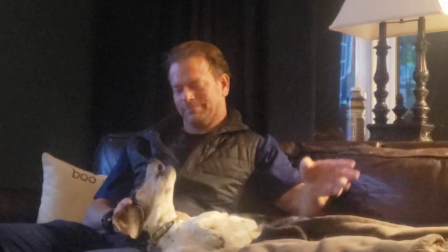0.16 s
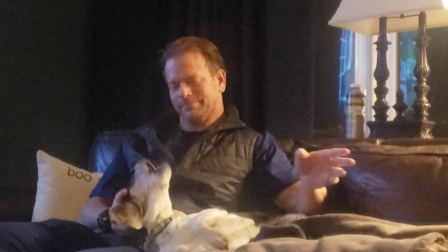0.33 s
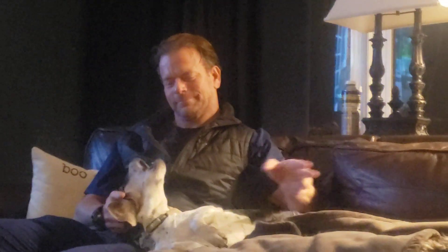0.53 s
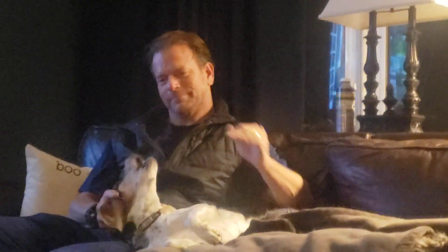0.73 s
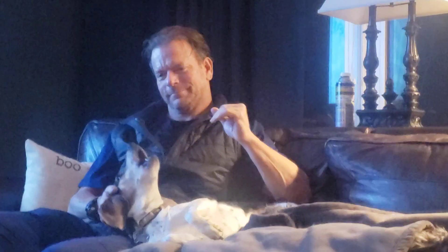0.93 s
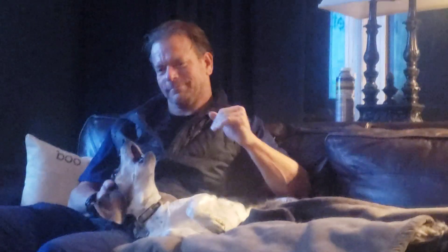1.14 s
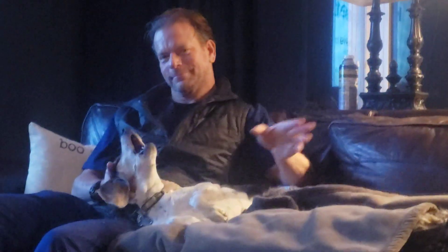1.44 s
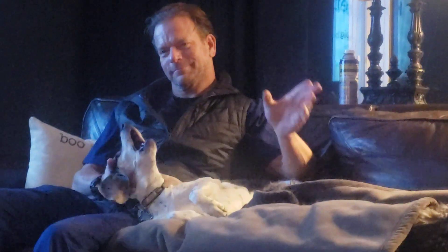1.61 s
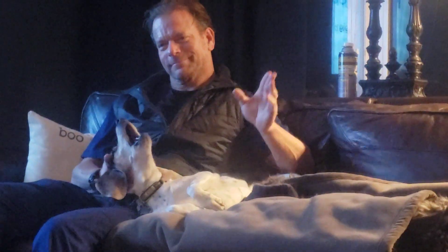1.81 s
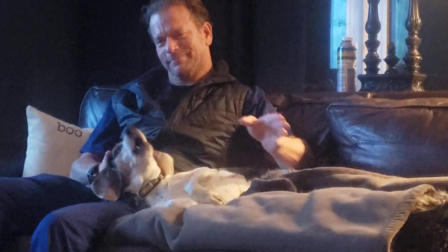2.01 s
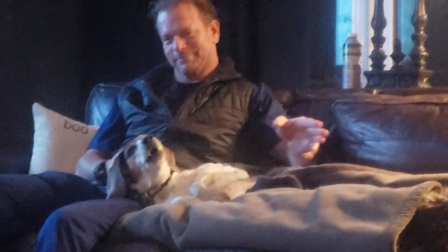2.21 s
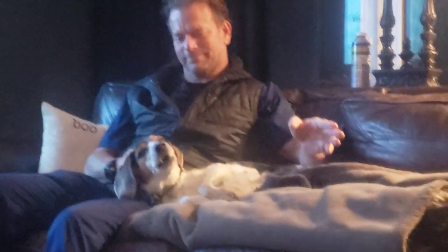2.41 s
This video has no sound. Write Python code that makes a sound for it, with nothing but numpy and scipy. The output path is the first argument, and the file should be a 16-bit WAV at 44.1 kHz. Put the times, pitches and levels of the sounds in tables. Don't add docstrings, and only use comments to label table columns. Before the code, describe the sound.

A dog howls indoors: a faint hoarse whine at 0 s swells into a loud mid-pitched howl by 0.3 s. The note wavers and cracks near 0.75, 1.0 and 1.57 s, with a slight rattle around 1.4 s. Higher whines poke through around 0.6-0.8 and 1.8 s. It fades by 2.15 s, leaving room tail, quiet hiss and hum; a soft, muffled new howl starts at 2.43 s. Faint couch bumps.

```python
import sys
import numpy as np
from scipy import signal
from scipy.fft import rfft, irfft, next_fast_len
from scipy.io import wavfile
from scipy.ndimage import map_coordinates

SR = 44100
rng = np.random.default_rng(int(sys.argv[2]) if len(sys.argv) > 2 else 0)


def transcribe(u):
    v = np.clip(np.atleast_2d(u).T, -1, 1)
    q = np.round(v * 32767).astype(np.int16)
    wavfile.write(sys.argv[1], SR, q)


def rack_gain(trim_db):
    fader = np.asarray(trim_db, float)
    return 10 ** (fader / 20)


N = 112454
TOP_HZ = 15800


def unit(x):
    return x / np.sqrt(np.mean(x ** 2) + 1e-20)


def along(points, hz):
    f, v = np.transpose(points)
    return np.interp(np.log(hz + 1), np.log(f + 1), v)


def wobble(rate, size=N):
    knots = rng.standard_normal(int(N * rate / SR) + 4)
    return map_coordinates(knots, [np.arange(size) * rate / SR])


def filtered(x, response):
    m = next_fast_len(N + 8192)
    return irfft(rfft(x, m) * response(np.fft.rfftfreq(m, 1 / SR)), m)[..., :N]


# f/Hz, level/dB
FLOOR = [(25, -19.5), (50, -16.5), (90, -11), (200, -14), (450, -17), (1500, -15), (4000, -32),
         (15700, -39.5)]


def floor_hiss():
    noise = rng.standard_normal((2, N))
    return rack_gain(-68) * unit(filtered(noise, lambda f: rack_gain(along(FLOOR, f))))


def mains_hum():
    t = np.arange(N) / SR
    pan_db, sway_db = -2, 1.2
    level = rack_gain(-67.5 + sway_db * wobble(4.1))
    return level * np.sin(2 * np.pi * 60 * t) * rack_gain([[pan_db], [-pan_db]])


# t/s, level/dB, share of the lighter knock (0-1)
THUMPS = [
    (.32, -60, 0.15),
    (.45, -69, 0.9),
    (0.579, -64.5, .8),
    (.7, -49.5, 0),
    (.8, -61, 1),
    (.93, -59, .9),
    (1.02, -63, 0.2),
    (1.8, -66, .3),
    (2.151, -56, 0.58),
]


def couch_bumps():
    t = np.arange(N) / SR
    span_s, pan_db = 0.029, 4
    corner_hz = np.reshape([90, 320], (2, 1, 1))
    noise = rng.standard_normal((2, 2, N))
    deep, light = unit(filtered(noise, lambda f: f / (f + 30) / (1 + (f / corner_hz) ** 2)))
    bumps = 0
    for start, db, share in THUMPS:
        swell = rack_gain(db) * np.exp(-((t - start) / span_s) ** 2)
        bumps = bumps + swell * (deep + np.clip(share, 0, 1) * (light - deep))
    return bumps * rack_gain([[pan_db], [-pan_db]])


def background():
    return floor_hiss() + mains_hum() + couch_bumps()


# f/Hz, decay by 60 dB/s
ROOM = [(300, 0.34), (1100, 0.46), (2500, 0.41), (6000, 0.28), (14000, 0.23)]


def placed(x, pan_db, lag_s, wet_db):
    treble_db = 4
    hz, t, z = signal.stft(rng.standard_normal((2, SR // 2)), SR, nperseg=256)
    decay_db = -60 * t / along(ROOM, hz)[:, None]
    colour_db = treble_db * np.log2(hz / 3000 + 1)[:, None]
    tail = signal.istft(z * rack_gain(decay_db + colour_db), SR, nperseg=256)[1]
    tail = tail / np.linalg.norm(tail[0]) * rack_gain(treble_db * 2)
    delayed = np.pad(x, (150, 0))[None]
    wet = signal.fftconvolve(delayed, tail, axes=1)[:, :N]
    side = np.array([[.5], [-.5]])
    direct = filtered(x, lambda f: rack_gain(side * pan_db) * np.exp(-2j * np.pi * f * side * lag_s))
    return direct + rack_gain(wet_db) * wet


def fold_lock(rattles):
    t = np.arange(N) / SR
    lock = np.zeros(N)
    for start, span, depth in rattles:
        lock += depth * np.clip(np.minimum(t - start, start + span - t) / 0.011, 0, 1)
    return lock


def overtone_gain(u, overtone_hz, k, db, throat, mouth, rings):
    at, *shape = np.transpose(mouth)
    tilt, chest_db, bright_db = [np.interp(u, at, c) for c in shape]
    ring_db = 0
    for when, span, centre, width, ring_level in rings:
        nearness = ((u - when) / span) ** 2 + ((overtone_hz - centre) / width) ** 2
        ring_db = ring_db + ring_level * np.exp(-nearness)
    mouth_db = chest_db * (k == 1) + bright_db * (overtone_hz > 3800)
    mouth_db = mouth_db + tilt * np.log2(overtone_hz / 1100) / 2
    effort_db = 0.12 * (db + 13.5) * np.log2(np.maximum(overtone_hz / 2170, 1)) ** .5
    gain = rack_gain(throat(overtone_hz) + ring_db + mouth_db + effort_db)
    return gain / (1 + (overtone_hz / 12500) ** 4), bright_db


def voice(notes, throat, rattles, mouth=((0, 0, 0, 0),), rings=()):
    attack_s, release_s = 0.0051, 0.022
    jitter, shimmer_db = 0.00497, 2
    breath_db, hiss_db = -14, -21
    tone, gate, air, t = np.zeros(N), np.zeros(N), np.zeros(N), np.arange(N) / SR
    lock = fold_lock(rattles)
    fast, mid, size_db = wobble(150), wobble(24.877), shimmer_db * wobble(60.13)
    scatter = .5 * rng.standard_normal((31, 1))
    for note in notes:
        s, *cols = np.transpose(note)
        on = (t >= s[0]) & (t < s[-1] + release_s)
        u = t[on]
        hz, db, rough = [np.interp(u, s, c) for c in cols]
        rough = np.clip(rough, 0, 1)
        unsteady_hz = hz * (1 + 0.0026 * mid[on] + 10 * jitter * rough * fast[on])
        phase = 2 * np.pi * np.cumsum(unsteady_hz) / SR
        k = np.arange(1, int(TOP_HZ / hz.min()) + 1)[:31, None]
        near = [r for r in rings if s[0] - 2 * r[1] < r[0] < s[-1] + 2 * r[1]]
        gain, bright_db = overtone_gain(u, k * hz, k, db, throat, mouth, near)

        locked_phase = phase + .12 * lock[on] * np.sin(phase / 4)
        wave = (gain * np.sin(k * locked_phase + scatter[:len(k)])).sum(0)
        wave = wave / np.sqrt((gain ** 2).sum(0) / 2)
        rise, fall = (u - s[0]) / attack_s, (s[-1] + release_s - u) / release_s
        edge = np.clip(np.minimum(rise, fall), 0, 1) * rack_gain(db)
        locked = 1 + lock[on] * (np.cos(phase / 4) + .5 * np.cos(phase / 2))
        tone[on] += edge * wave * locked * rack_gain(size_db[on] * (.3 + 4 * rough))

        gate[on] += edge * (rough + .02) * (1 + 0.63 * np.cos(phase))
        gust = rack_gain(4 * mid[on] + size_db[on] + bright_db)
        air[on] += edge * (rough + 0.11) * gust * locked * (0.11 + np.cos(phase / 2) ** 6)

    def breath_colour(f):
        return rack_gain(np.maximum(throat(f), -14 - f / 200)) * (f < 3800)

    def hiss_colour(f):
        return rack_gain(throat(f) + np.log2(f / 8000 + 1)) / (1 + (5200 / (f + 1)) ** 8)

    breath = unit(filtered(rng.standard_normal(N), breath_colour))
    hiss = unit(filtered(rng.standard_normal(N), hiss_colour))
    mix = tone + rack_gain(breath_db) * gate * breath + rack_gain(hiss_db) * air * hiss
    return filtered(mix, lambda f: 1 / (1 + (475 / (f + 1)) ** 16))


# t/s, f/Hz, level/dB, roughness (0-1)
WHINE_1 = [(0, 491.7, -56, 0.5), (.05, 520, -55.5, 0.46), (.085, 683.5, -46, 0.65), (.12, 784, -43, 0.4),
           (.17, 744, -44.5, 0.5), (.24, 634, -41.5, 0.3)]
WHINE_2 = [(.41, 850.6, -54, 0.48), (0.478, 860, -47.5, 0.6), (.54, 801, -61, 0.46),
           (0.569, 858.4, -30, .1), (0.627, 890, -26, 0.055), (.64, 885, -49, .3), (.72, 855, -58.5, 0.29)]
WHINE_3 = [(.6, 1005, -34, 0.11), (0.629, 1065, -24, 0.05), (.655, 1066, -28, .05),
           (.68, 1071, -23.5, 0.035), (0.729, 1022, -27, 0.22), (0.818, 1043, -43, 0.52)]
WHINE_4 = [(1.077, 922, -69, 0.47), (1.132, 899, -42.5, 0.13), (1.169, 695, -37.5, 0.15),
           (1.25, 633, -57.5, 0.19)]
WHINE_5 = [(1.71, 1053, -45, 0.037), (1.76, 1081, -26.5, 0.023), (1.821, 1050, -24.5, 0.15),
           (1.87, 1038, -34.5, 0.17), (1.908, 956, -59, 0.69), (1.96, 937, -58.5, 0.74)]
WHINE_6 = [(2.434, 800, -62, 0.7), (2.465, 735, -68, .7)]
# f/Hz, level/dB
WHINE_THROAT = [(500, 13.5), (900, 0), (1500, -9), (2150, 4.5), (2700, -32), (3250, -8.5), (4300, -56.5),
                (5400, -31.5), (11500, -32), (15000, -68)]
ONSET_THROAT = [(480, 0), (780, 0), (1000, -3), (1500, 0), (2000, -22), (2500, -24), (3200, -40),
                (6000, -50)]


def whine():
    notes = [WHINE_2, WHINE_3, WHINE_4, WHINE_5, WHINE_6]
    dry = voice(notes, lambda hz: along(WHINE_THROAT, hz), [])
    dry = dry + voice([WHINE_1], lambda hz: along(ONSET_THROAT, hz), [])
    return rack_gain(3) * placed(dry, pan_db=-4, lag_s=-0.000059, wet_db=-4)


# t/s, span/s, level/dB
CRACKS = [
    (0.294, 0.023, -32),
    (.47, 0.071, -29),
    (0.761, 0.03, -27.5),
    (0.996, .02, -26.5),
    (1.583, 0.018, -34),
    (1.732, .03, -41),
    (2.138, 0.036, -50),
    (.04, 0.11, -57),
]
# f/Hz, level/dB
CRACK_COLOUR = [(450, -31), (600, -0.5), (900, -3), (1400, -5), (2200, 2.5), (2900, -14), (3500, -28.5),
                (5000, -61.5)]


def cracks():
    t = np.arange(N) / SR
    swell = sum(rack_gain(db) * np.exp(-((t - start) / span) ** 2) for start, span, db in CRACKS)
    air = unit(filtered(rng.standard_normal(N), lambda f: rack_gain(along(CRACK_COLOUR, f))))
    return swell * rack_gain(3 * wobble(80)) * air


# f/Hz, level/dB
THROAT = [(530, -16), (620, -4.5), (834, -22), (1170, 3.5), (1470, -9), (2170, -0.5), (2800, -17),
          (3300, -22.5)]
UPPER = [(3800, -6.5), (4260, -5), (5150, -6), (6100, -1), (7400, -5), (9500, -15), (12000, -14),
         (15700, -15)]


def howl_throat(hz):
    low = along(THROAT, hz) - 90 * np.clip(hz / 3300 - 1, 0, 1)
    return np.where(hz < 3800, low, -30.5 + along(UPPER, hz))


# t/s, f/Hz, level/dB, roughness (0-1)
NOTE_1 = [(.085, 543.7, -39.5, 0.56), (.147, 552.4, -32, 0.26), (.225, 573.8, -23, 0.24),
          (.28, 669.3, -18.5, 0.61)]
NOTE_2 = [(0.284, 530, -17.5, 0.19), (0.319, 557.8, -18.5, 0.12), (0.372, 598.9, -14, 0.3),
          (.41, 606, -16, 0.091), (0.446, 592.5, -17.5, 0.16), (0.498, 580.7, -17.5, 0.054),
          (0.559, 570.8, -16.5, 0.027), (0.618, 553.1, -16, 0.12), (0.657, 538.3, -12.5, 0.04),
          (0.69, 535.7, -12.5, 0.089), (0.739, 535, -19.5, 0.15)]
NOTE_3 = [(.745, 546, -16, 0.29), (0.78, 585.1, -21.5, 0.2), (0.833, 613.2, -17, 0.086),
          (.88, 595.1, -23, .1), (0.913, 581.6, -18.5, 0.15), (0.946, 600.6, -15.5, .15),
          (0.966, 648.5, -16, 0.24)]
NOTE_4 = [(.975, 534.7, -20.5, 0.34), (0.998, 532, -18.5, 0.095), (1.114, 539.8, -18.5, 0.16),
          (1.169, 536.7, -16, 0.03), (1.244, 522.5, -20, 0.048), (1.327, 538.5, -15.5, 0.024),
          (1.398, 550.5, -21, 0.11), (1.452, 548.5, -18.5, .15), (1.501, 545.6, -18.5, .08),
          (1.566, 552.5, -17.5, 0.045)]
NOTE_5 = [(1.57, 596.8, -21.5, 0.11), (1.601, 595.3, -16, 0.093), (1.664, 612.7, -18, 0.024),
          (1.732, 619.6, -21.5, 0.1), (1.783, 606.7, -16, 0.036), (1.872, 585, -21.5, 0.085),
          (1.95, 599, -18, 0.068), (2.002, 601.4, -19, 0.04)]
NOTE_6 = [(2.005, 565.9, -25, 0.11), (2.05, 567.1, -20, 0.11), (2.091, 568.2, -27.5, 0.12),
          (2.151, 577.5, -38, 0.35)]
NOTE_7 = [(2.431, 511.6, -40, 0.34), (2.485, 511, -37.5, 0.17), (2.51, 510, -41.5, 0.11),
          (2.549, 514.6, -33, .08)]
# f/Hz, level/dB
CLOSED = [(510, -0.5), (1020, 0), (1530, -11), (2050, 3), (2560, -18.5), (3050, -63.5), (4800, -37),
          (6500, -27), (9000, -36.5), (15000, -45)]
# t/s, length/s, depth (0-1)
RATTLES = [
    (1.39, 0.095, 0.26),
    (1.485, .05, .08),
    (.28, 0.03, 0.2),
    (1.57, .02, .1),
]
# t/s, tilt/(dB per octave, half applied), chest/dB, brightness/dB
MOUTH = [(.085, -7.5, 15, -8), (.2, 0.5, 3, -8), (.3, 14.5, 6.5, -14.5), (.42, 0.5, -1.5, 1),
         (.55, -1.5, -1.5, 4.5), (.68, -7.5, -14.5, 0.5), (.8, 0, 0, 2), (.96, 4, 3, -2),
         (1.1, -1.5, -2, 6.5), (1.3, -7, -8, 3.5), (1.45, -3, -5.5, 3.5), (1.65, -2, -2.5, 1.5),
         (1.8, -0.5, -1, 2), (2.0, -2, 0, -5), (2.07, -14, 4, 5), (2.15, -8, 11, 6)]
# t/s, span/s, f/Hz, width/Hz, level/dB
RINGS = [(.39, .07, 4200, 400, 16), (.4, .08, 7300, 500, 7), (.65, .08, 6100, 506, 12),
         (.69, .04, 13000, 1500, 20.5), (1.0, .06, 3300, 300, 12.5), (1.52, 0.034, 6100, 500, 12),
         (1.8, 0.071, 11300, 1200, 16), (1.25, 0.26, 3200, 400, -10), (1.6, .1, 4300, 700, -10),
         (2.1, 0.14, 2900, 500, -10), (2.1, .07, 7700, 500, 23.5), (0.25, 0.12, 4360, 540, 16.5),
         (0.6, 0.17, 1800, 100, -7.5), (1.83, 0.3, 1800, 250, -6), (0.56, .12, 4600, 500, -10.5)]


def howl():
    notes = [NOTE_1, NOTE_2, NOTE_3, NOTE_4, NOTE_5, NOTE_6]
    dry = voice(notes, howl_throat, RATTLES, MOUTH, RINGS)
    dry = dry + voice([NOTE_7], lambda hz: along(CLOSED, hz), []) + cracks()
    return rack_gain(-3) * placed(dry, pan_db=2.5, lag_s=.0001, wet_db=-3)


def scene():
    return background() + whine() + howl()


# f/Hz, width/Hz, depth (0-1)
NOTCHES = [
    (3780, 260, 0.96),
    (8750, 380, 0.95),
    (13700, 500, .6),
]


def housing_dips(hz):
    dips = [1 - np.clip(depth, 0, 1) * np.exp(-((hz - centre) / width) ** 2) for centre, width, depth in NOTCHES]
    return np.prod(dips, axis=0)


def roll_off(x):
    return signal.sosfilt(signal.butter(12, 15910, fs=SR, output="sos"), x)


def record(dry):
    bent = dry + 0.022 * dry ** 2

    def response(hz):
        return housing_dips(hz) * (hz < TOP_HZ) * hz ** 2 / (hz ** 2 + 25 ** 2)

    mix = filtered(bent, response)
    return roll_off(mix)


dry = scene()
out = record(dry)
transcribe(out)
```